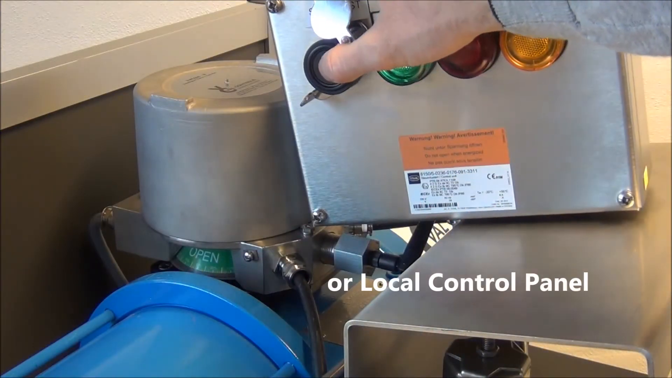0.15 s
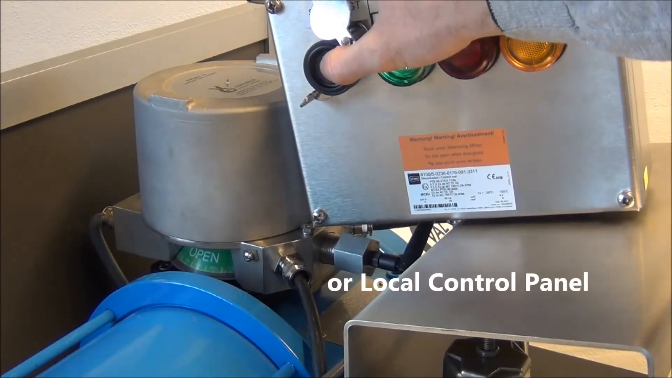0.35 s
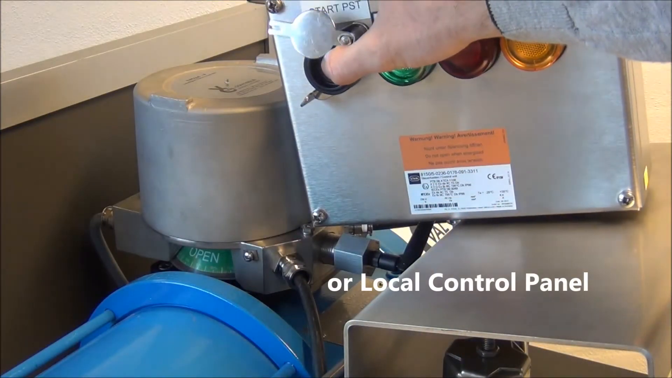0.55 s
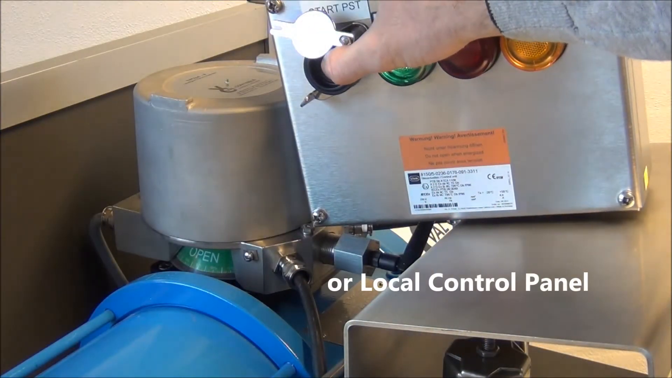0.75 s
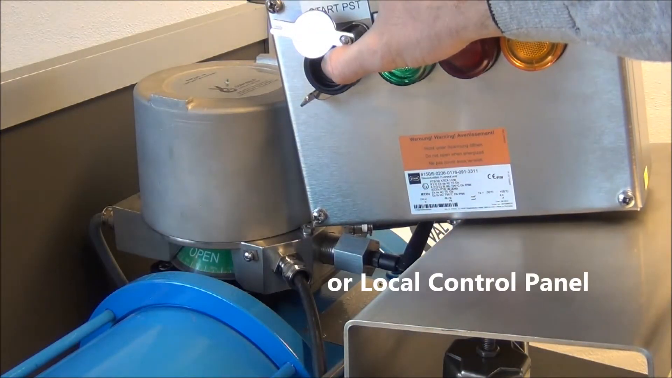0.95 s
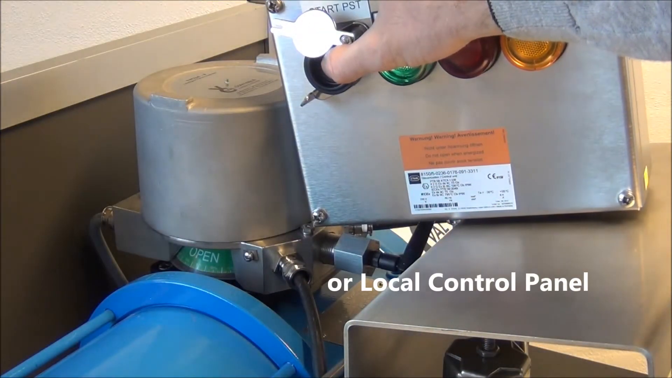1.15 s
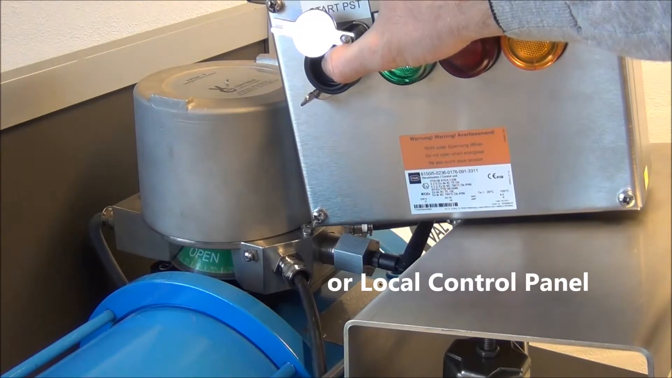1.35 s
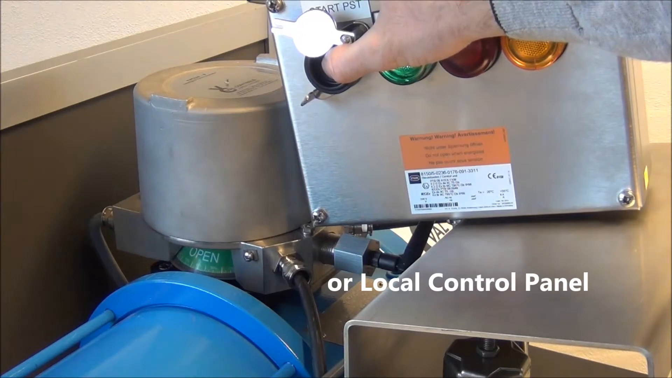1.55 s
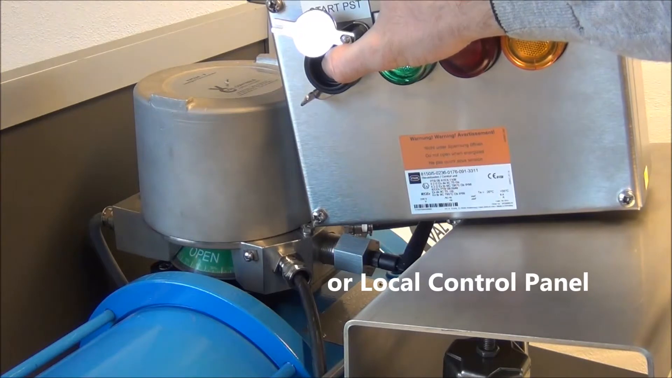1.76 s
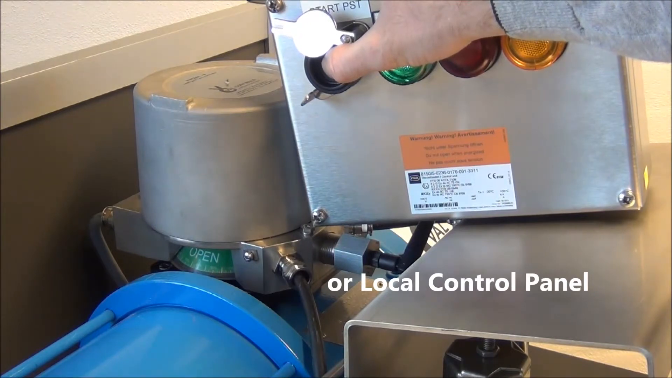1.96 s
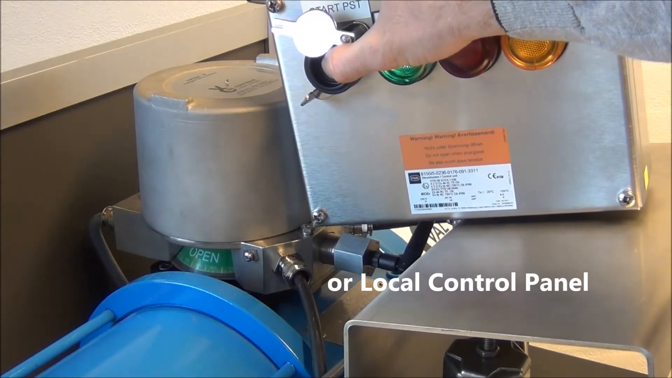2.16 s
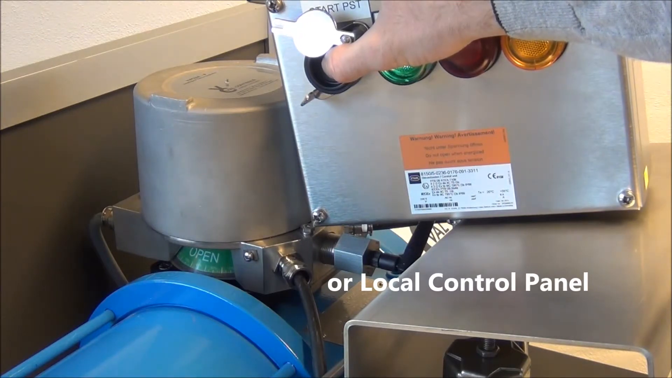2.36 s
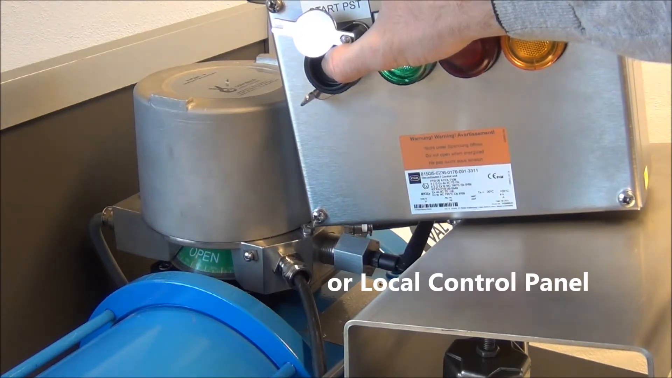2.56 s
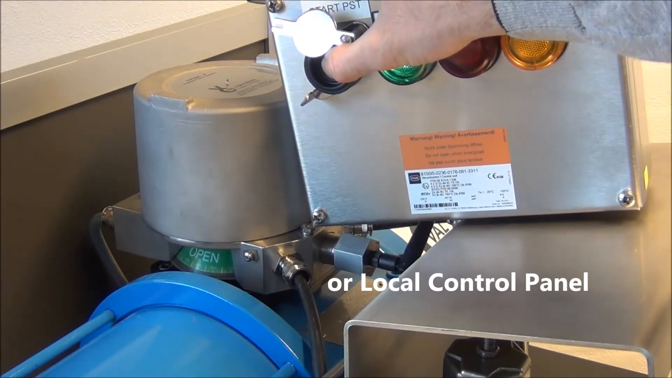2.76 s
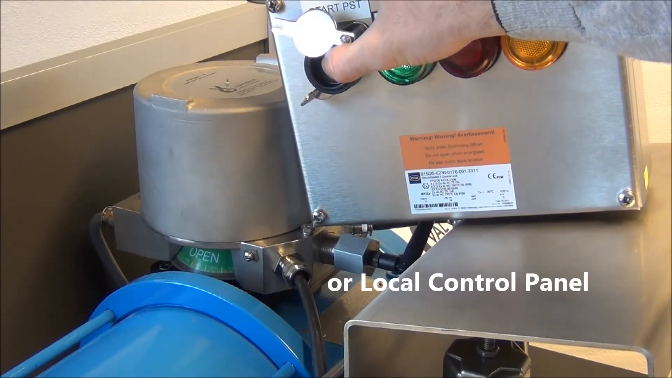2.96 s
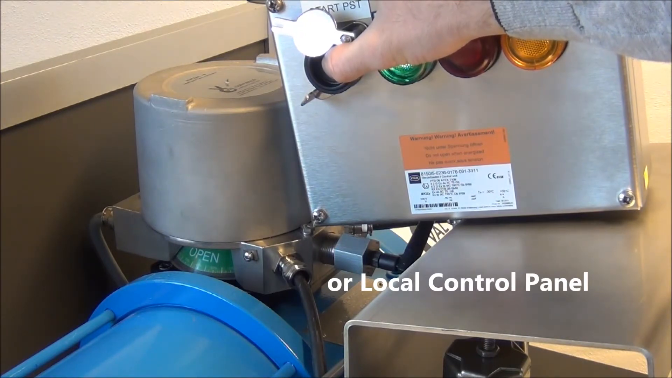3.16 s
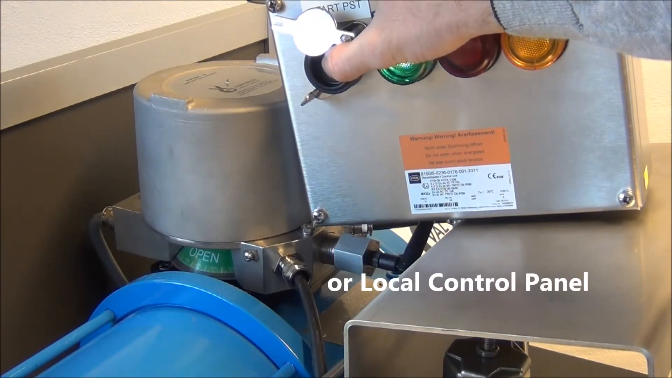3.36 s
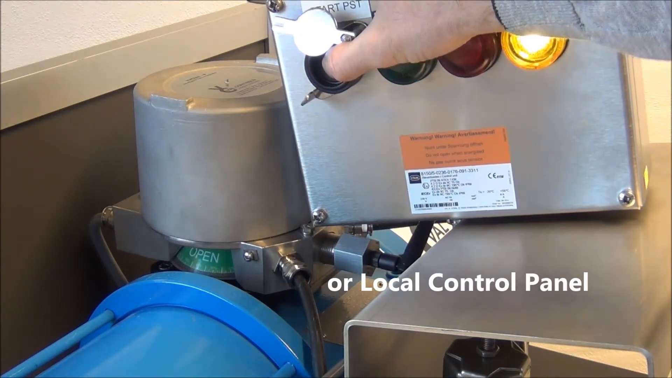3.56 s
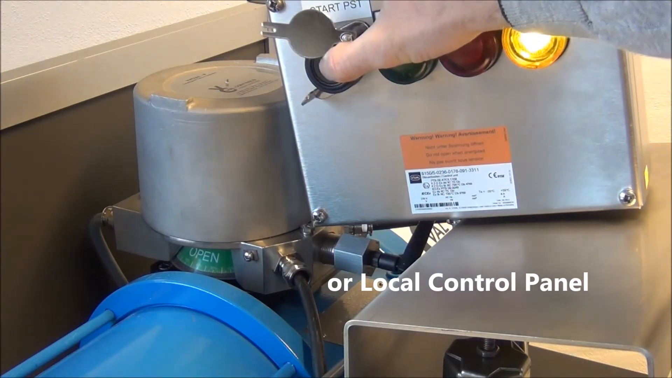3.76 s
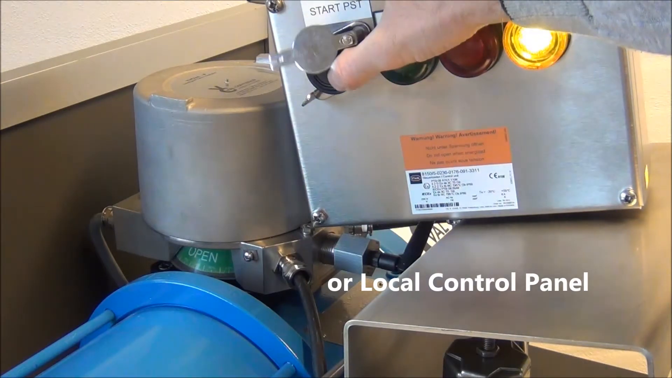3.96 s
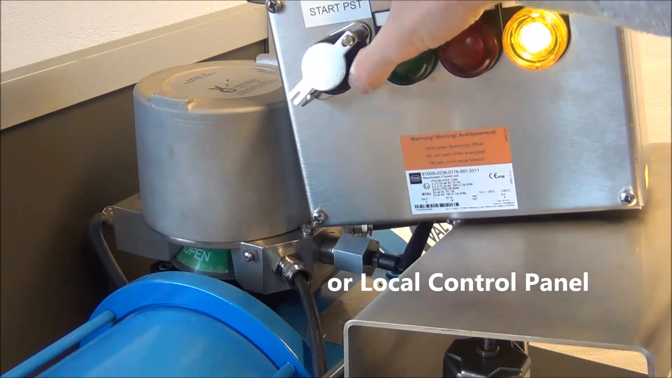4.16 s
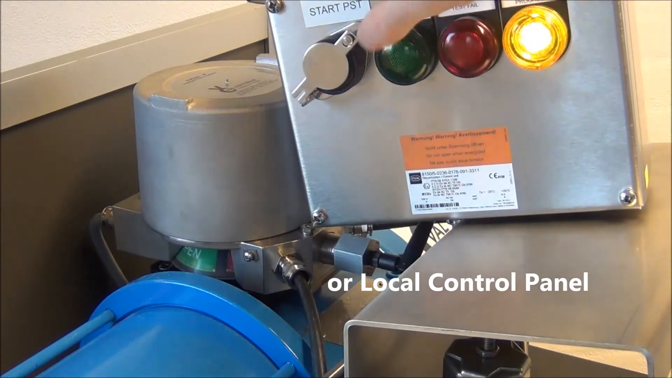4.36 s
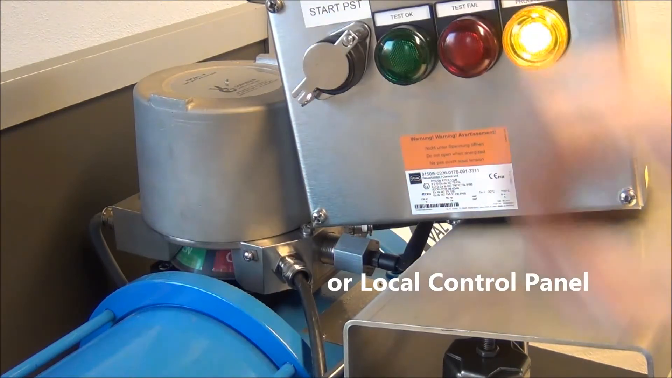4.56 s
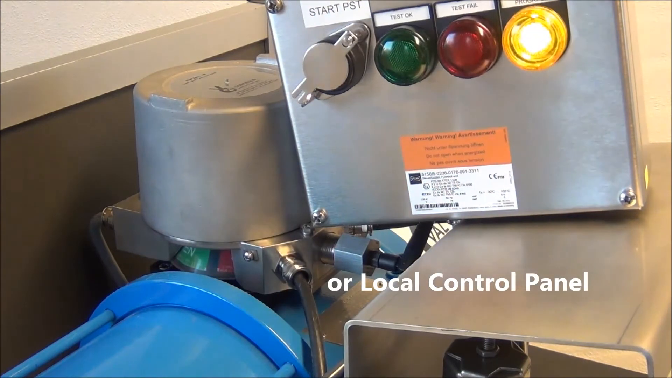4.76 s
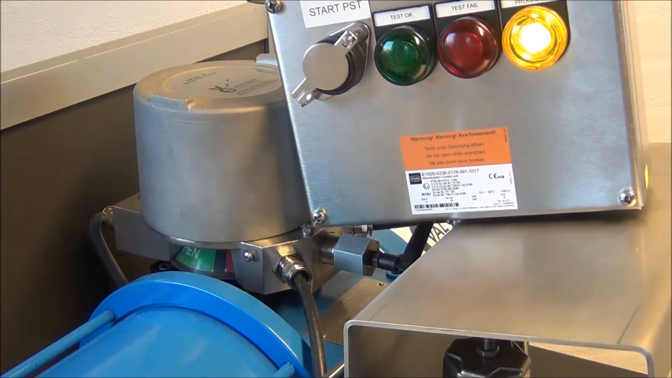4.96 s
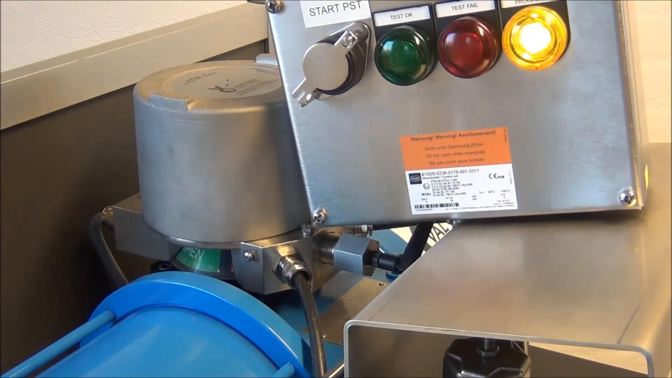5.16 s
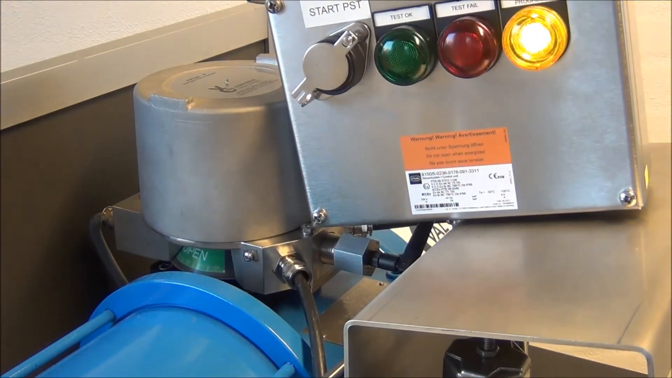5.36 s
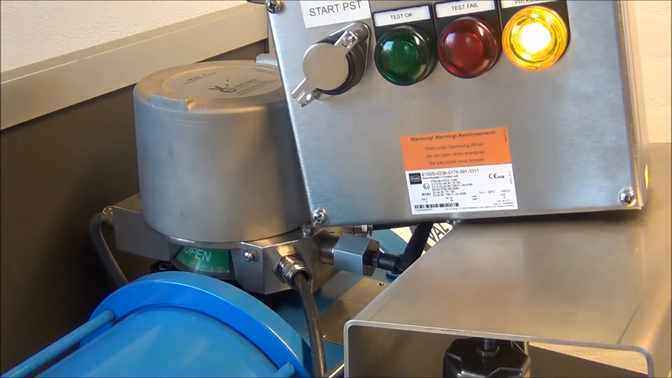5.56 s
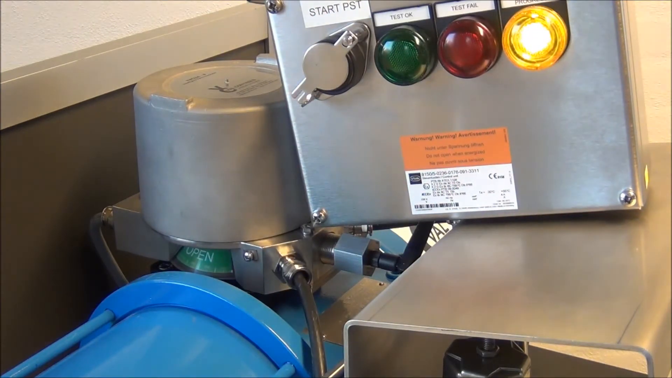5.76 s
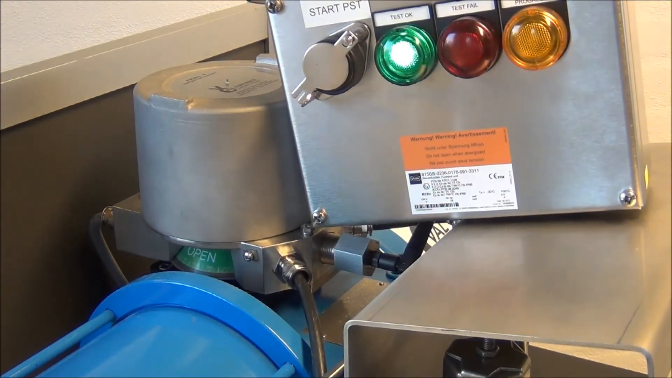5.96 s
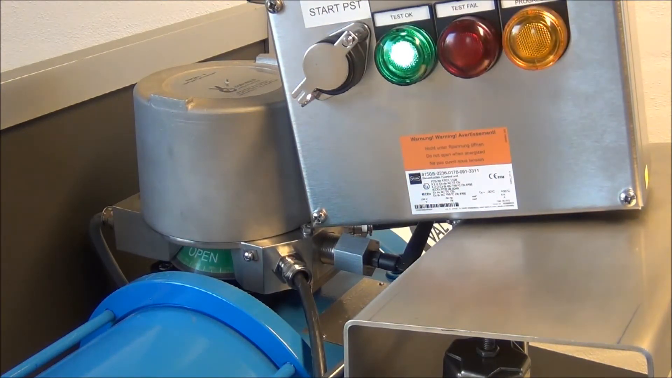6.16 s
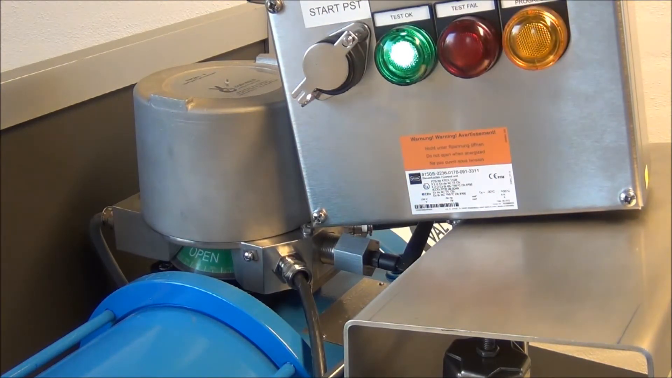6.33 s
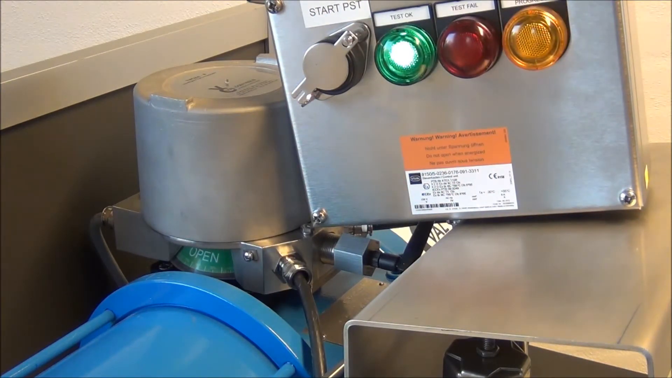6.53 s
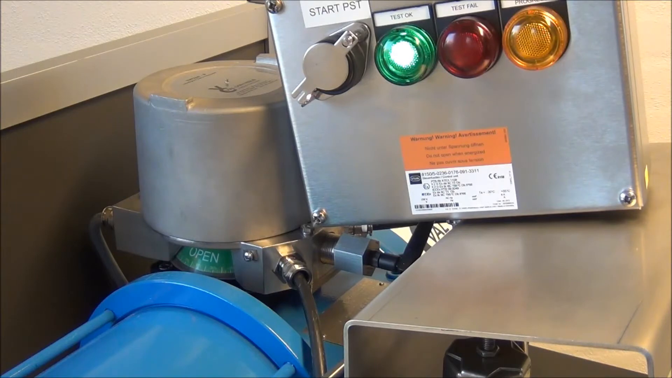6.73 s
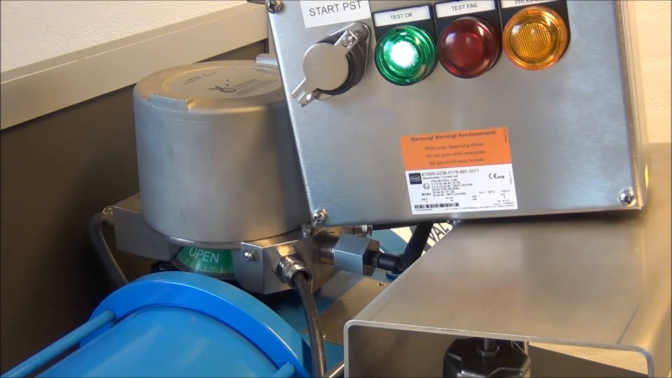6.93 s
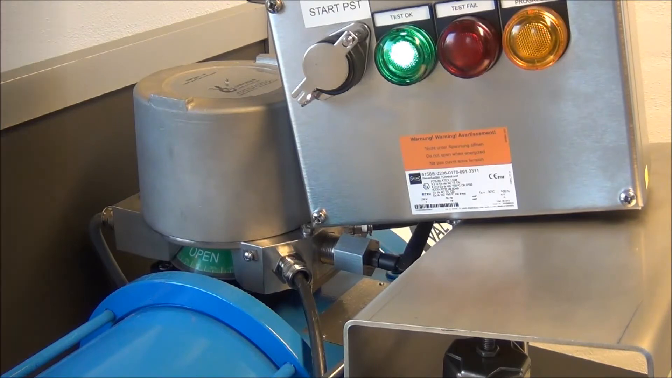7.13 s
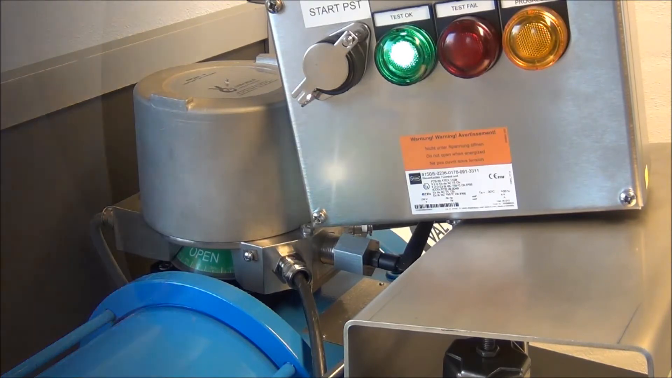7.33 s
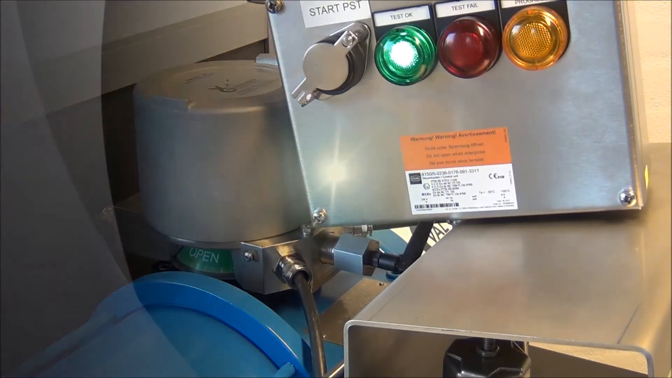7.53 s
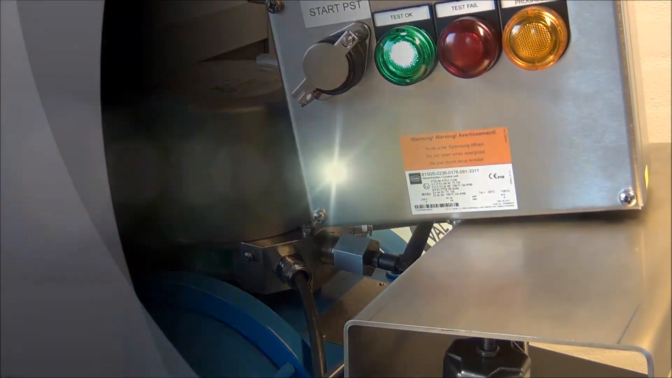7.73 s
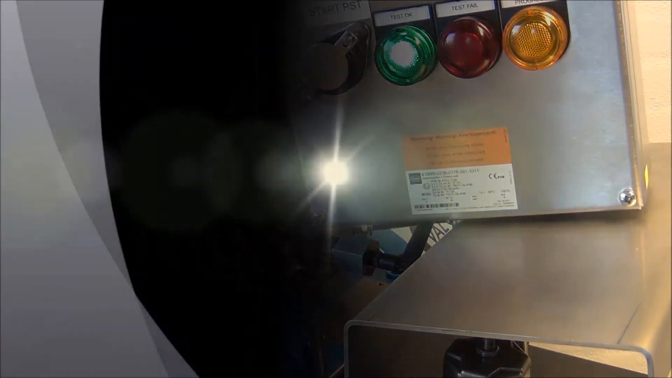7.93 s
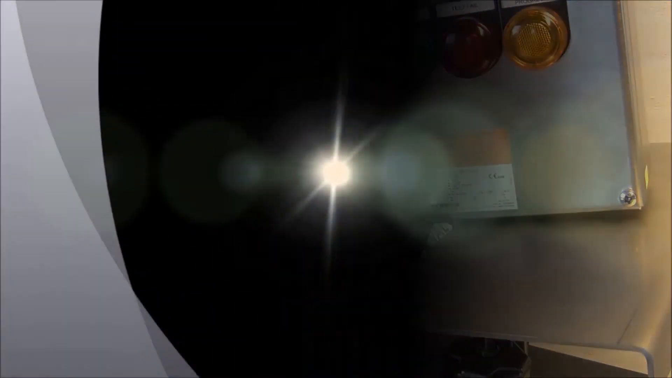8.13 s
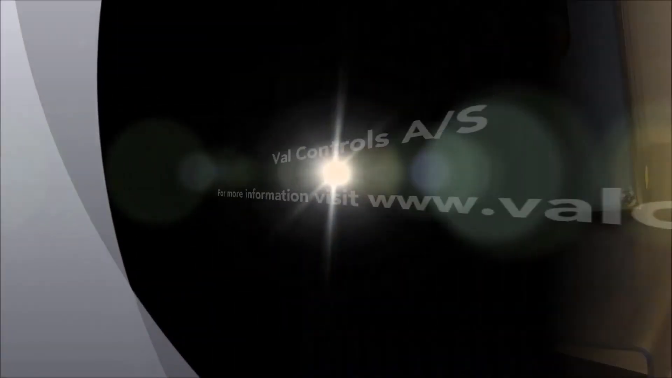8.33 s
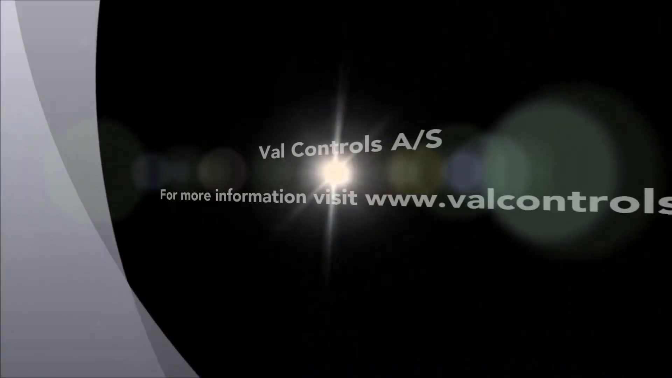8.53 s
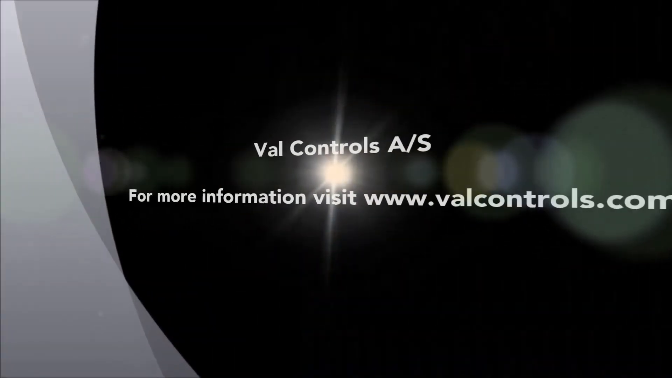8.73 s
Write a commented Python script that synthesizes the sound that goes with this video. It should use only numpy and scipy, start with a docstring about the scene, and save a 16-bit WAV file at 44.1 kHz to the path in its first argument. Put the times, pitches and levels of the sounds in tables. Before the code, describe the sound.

Faint ventilation noise runs throughout in a small room. From about 0.2 seconds, a push button and its metal cover tap and scrape close by, ending at 0.6 in a sharp clack that briefly rings a steel box. A tiny tick follows near 1.9. At 3.5 seconds a valve knocks and a pneumatic actuator releases a loud, bright jet of air, by far the loudest sound, weakening slightly until it shuts with a dull knock at 4.6. Air then flows back in a softer hiss with faint wavering whistles, growing brighter until about 6.4. The piston knocks lightly a few times between 6.15 and 6.4. At 6.2 a compressor starts farther off with a short low shudder and settles into a quiet, throbbing hum with a thin whine. The background dips after loud sounds and creeps back. Everything stops at about 8.6 seconds.

```python
"""At a steel control box beside a pneumatic actuator, over faint ventilation noise.
A push button and its metal cover clack and scrape, exciting the box's modes. A solenoid valve then dumps
the actuator's air in one loud turbulent jet. Air flows back more softly, with faint edge tones, until the
piston knocks home, and a compressor starts to hum at harmonics of its shaft rate.
An automatic gain control ducks at each loud sound and creeps back up."""
import sys
import numpy as np
from scipy import signal
from scipy.fft import rfft, irfft, next_fast_len
from scipy.io import wavfile
from scipy.ndimage import uniform_filter1d

SR = 44100
rng = np.random.default_rng(int(sys.argv[2]) if len(sys.argv) > 2 else 0)


def to_wav(sig):
    """Store sig (one row per channel, or 1-D mono) as 16-bit WAV at the path in sys.argv[1].

    Samples outside -1..1 are clipped; the rate is SR.
    """
    pcm = np.clip(np.atleast_2d(sig), -1, 1) * 32767
    pcm = np.round(pcm).astype(np.int16)
    wavfile.write(sys.argv[1], SR, pcm.T)  # frames by channels


N = 387638
TIME = np.arange(N) / SR


def amp(db):
    """Amplitude ratio of a level in decibels."""
    return 10 ** (np.asarray(db) / 20)


def unit(x):
    """Normalisation to rms 1."""
    return x / np.sqrt(np.mean(x ** 2) + 1e-20)


def along(points, hz):
    """Interpolation of (frequency, value) points on a logarithmic frequency axis."""
    point_hz, values = np.transpose(points)
    return np.interp(np.log(hz + 1), np.log(point_hz + 1), values)


def wobble(rate, size=N):
    """Random modulation: straight lines between Gaussian knots, rate of them a second."""
    knots = rng.standard_normal(int(size * rate / SR) + 2)
    return np.interp(np.arange(size) * rate / SR, np.arange(len(knots)), knots)


def gate(start, end, rise_s, release_t60, sag_db_per_s=0):
    """Exponential envelope: it rises from start, sags steadily and dies away after end."""
    held, released = np.maximum(TIME - start, 0), np.maximum(TIME - end, 0)
    return (1 - np.exp(-held / rise_s)) * amp(-sag_db_per_s * held - 60 * released / release_t60)


def filtered(x, gain):
    """Zero-phase filtering: the spectrum of x times gain(frequency)."""
    n = x.shape[-1]
    padded = next_fast_len(n + 4096, True)
    return irfft(rfft(x, padded) * gain(np.fft.rfftfreq(padded, 1 / SR)), padded)[..., :n]


def lowpass(hz, cutoff_hz):
    """Magnitude response of a second-order Butterworth low-pass."""
    return 1 / np.sqrt(1 + (hz / cutoff_hz) ** 4)


def noise(spectrum, peaks=(), cutoff_hz=SR, size=N):
    """Source-filter model: white noise shaped by a broad spectrum and resonance peaks, at rms 1."""
    def gain(hz):
        peaks_db = sum(db / (1 + (2 * (hz - centre) / width) ** 2) for centre, width, db in peaks)
        return amp(along(spectrum, hz) + peaks_db) * lowpass(hz, cutoff_hz)
    return unit(filtered(rng.standard_normal(size), gain))


def stereo_noise(spectrum, peaks, width):
    """Partial coherence: two close microphones share a mid signal and differ by a side signal."""
    mid, side = noise(spectrum, peaks, size=(2, N))
    side = filtered(side, lambda hz: amp(along(width, hz)))
    return np.array([mid + side, mid - side])


def pan(left_db):
    """A level difference between the channels sets a source off centre."""
    return amp([[left_db], [-left_db]])


def add(track, start, sound):
    """Superposition of a short sound on a track, from start in seconds."""
    part = track[round(start * SR):][:len(sound)]
    part += sound[:len(part)]


# reverberation time of the room: (frequency [Hz], t60 [s])
ROOM_T60 = [(100, .6), (500, 0.28), (3000, 0.24), (8000, 0.47), (15000, 0.55)]

def room(x):
    """Diffuse reverberation: convolution with decaying noise, shortest in the midrange."""
    hz, t, spectra = signal.stft(rng.standard_normal((2, SR)), SR, nperseg=256)
    tail = signal.istft(spectra * amp(-60 * t / along(ROOM_T60, hz)[:, None]), SR, nperseg=256)[1]
    return signal.fftconvolve(x, tail / np.linalg.norm(tail[0]), axes=1)[:, :N]


def panel_echoes(x, channels, count=14):
    """Early reflections: copies from nearby steel sheets ripple the spectrum by interference."""
    echoes = np.zeros((channels, SR // 40))  # delays up to 25 ms
    for channel in echoes:
        signs = rng.choice([-1, 1], count)
        channel[rng.integers(SR // 400, len(channel), count)] = signs / np.sqrt(count)
    return signal.oaconvolve(np.atleast_2d(x), echoes, axes=1)[:, :N]


# spectrum of the noise floor: (frequency [Hz], relative level [dB])
FLOOR_SPECTRUM = [(15, -43), (25, -11.5), (61, 0.5), (110, -11.5), (221, -11.5), (469, -15), (631, -12.5),
                  (722, -16), (1050, -15), (1380, -19.5), (2060, -21.5), (12500, -26), (15500, -26)]
# its stereo width: (frequency [Hz], side minus mid [dB])
FLOOR_WIDTH = [(60, -27.5), (240, -6.5), (950, -2.5), (3770, -3), (15000, -14)]

def ventilation(level_db=-48):
    """Stationary broadband noise: ventilation and microphone hiss form the noise floor."""
    return amp(level_db) * stereo_noise(FLOOR_SPECTRUM, (), FLOOR_WIDTH)


# harmonics of the low hum: (frequency [multiples of the shaft rate])
HUM_ORDERS = (1, 2, 3, 4, 6, 7, 9, 16)
# harmonics at which the housing whines: (frequency [multiples of the shaft rate])
WHINE_ORDERS = (35, 38, 39, 40, 41, 44, 58, 75)
# strength of each whine harmonic: (level [dB])
WHINE_LEVELS = (-59, -57.5, -57.5, -64, -63, -52, -60.5, -66)
# spectrum of the pump noise: (frequency [Hz], relative level [dB])
PUMP_SPECTRUM = [(40, -10), (100, -9.5), (400, -9.5), (1100, -22.5), (2200, -12.5), (3500, -17),
                 (5000, -25), (9000, -20), (15000, -32.5)]
# resonances of the housing: (frequency [Hz], bandwidth [Hz], gain [dB])
HOUSING_PEAKS = [(787, 70, -4.5), (1350, 490, 13.5), (1880, 220, 9), (2177, 27, 6.5), (2805, 220, 6.5),
                 (3630, 83, 15)]
# stereo width of the pump noise: (frequency [Hz], side minus mid [dB])
PUMP_WIDTH = [(60, -28.5), (380, -13), (2380, -7.5), (15000, -32)]
# spectrum of the starting shudder: (frequency [Hz], relative level [dB])
SHUDDER_SPECTRUM = [(30, -4), (100, 6.5), (300, -5), (700, -24.5), (2000, -48.5)]

def compressor(start=6.2, rise_s=.3, shaft_hz=48.72, drift=.0007, throb_depth=.23,
               buzz_db=-54, pump_db=-48, shudder_db=-40):
    """Periodic forcing: shaft harmonics, a buzz and throbbing pump noise swell with a brief shudder."""
    turns = shaft_hz * np.cumsum(1 + drift * wobble(4)) / SR
    hum = [(order, -57 - .5 * np.log2(order)) for order in HUM_ORDERS]  # falls 0.5 dB per octave
    whine = list(zip(WHINE_ORDERS, WHINE_LEVELS))
    tones = sum(np.sqrt(2) * amp(db) * np.sin(2 * np.pi * (order * turns + rng.random()))
                for order, db in hum + whine)
    strokes = np.diff(np.floor(turns), prepend=0)  # one pulse per turn
    stroke_sound = noise(PUMP_SPECTRUM, cutoff_hz=5600, size=1024)
    buzz = unit(signal.fftconvolve(strokes, stroke_sound)[:N])
    throb = 1 + throb_depth * np.sin(2 * np.pi * turns)
    pump = throb * stereo_noise(PUMP_SPECTRUM, HOUSING_PEAKS, PUMP_WIDTH)
    pump = filtered(pump, lambda hz: lowpass(hz, cutoff_hz=6400))
    swell = 1 - np.exp(-np.maximum(TIME - start, 0) / rise_s)
    running = swell * (tones + amp(buzz_db) * buzz + amp(pump_db) * pump)
    shudder = amp(shudder_db) * gate(start, start + .26, rise_s, release_t60=.4) * noise(SHUDDER_SPECTRUM)
    return (running + shudder) * pan(left_db=.4)


# whistles of the air line: (start [s], end [s], start pitch [Hz], end pitch [Hz], relative level [dB])
EDGE_TONES = [(4.85, 5.6, 1650, 1700, -47), (5.28, 5.65, 2110, 1970, -47), (5.65, 6, 1880, 1780, -50),
              (4.7, 5.45, 2260, 2335, -46), (4.7, 5.6, 2920, 2880, -43), (4.7, 5.25, 3330, 3220, -44),
              (5.05, 5.38, 4560, 4420, -45), (4.9, 5.2, 1000, 990, -48)]

def whistles(waver=.006, flicker_db=4, faint_count=14, low_hz=1900, high_hz=6000):
    """Edge tones flicker and glide as the pressure changes, among fainter ones that come and go."""
    out, faint = np.zeros(N), []
    for when, pitch, fall in rng.random((faint_count, 3)):
        start = 4.6 + .5 * when
        hz = low_hz * (high_hz / low_hz) ** pitch
        faint.append((start, start + .45, hz, hz * (1 - .03 * fall), -51))  # columns as in EDGE_TONES
    for start, end, start_hz, end_hz, db in EDGE_TONES + faint:
        n = round((end - start) * SR)
        hz = np.linspace(start_hz, end_hz, n) * (1 + waver * wobble(200, n))
        envelope = amp(db + flicker_db * wobble(50, n)) * np.hanning(n)
        add(out, start, envelope * np.sin(2 * np.pi * np.cumsum(hz) / SR))
    return out


# inflow to the cylinder as a fading surge, a long fill and a last top-up:
# (open [s], shut [s], level [dB], rise [s], sag [dB/s], added cutoff [Hz])
INFLOWS = [(4.662, 5.601, -14.5, .01, 29.5, 0), (5.22, 6.37, -23, 0.55, 0.5, 14501),
           (6.554, 6.593, -49, 0.022, 1, 7000)]
# spectrum of the supply hiss: (frequency [Hz], relative level [dB])
SUPPLY_SPECTRUM = [(200, -13.5), (600, -9.5), (1800, -6), (4500, -5.5), (7000, 0.5), (10000, -2.5),
                   (14000, 1), (15600, -5)]
# its resonances: (frequency [Hz], bandwidth [Hz], gain [dB])
SUPPLY_PEAKS = [(1780, 106, 3), (3000, 920, 4.5), (4490, 660, 6), (5520, 170, 4.5), (6320, 76, 5.1),
                (7820, 260, 5.5), (9141, 1000, 7), (10530, 799, 10), (12860, 210, 9.5)]
# its stereo width: (frequency [Hz], side minus mid [dB])
SUPPLY_WIDTH = [(400, -49), (4500, -19.5), (6000, -8.5), (14000, -4.5), (15500, -23)]

def refill(trickle_cutoff_hz=4300, release_t60=.51):
    """Flow noise: the returning air hisses louder and brighter as the supply port opens."""
    flow, cutoff_hz = 0, trickle_cutoff_hz
    for start, end, db, rise_s, sag_db_per_s, added_hz in INFLOWS:
        opening = gate(start, end, rise_s, release_t60, sag_db_per_s)
        flow += amp(db) * opening
        cutoff_hz += added_hz * opening
    turbulence = stereo_noise(SUPPLY_SPECTRUM, SUPPLY_PEAKS, SUPPLY_WIDTH)
    hz, t, spectra = signal.stft(turbulence, SR, nperseg=512)
    spectra *= lowpass(hz[:, None], np.interp(t, TIME, cutoff_hz))
    hiss = signal.istft(spectra, SR, nperseg=512)[1][:, :N]
    return flow * hiss * pan(left_db=.14)


# the cover rubs, catches and settles: (start [s], end [s], level [dB], release t60 [s])
SCRAPES = [(0.369, 0.547, -42.5, .05), (0.445, 0.452, -43, 0.09), (.525, 0.526, -29.5, .1),
           (0.55, 0.566, -24.5, 0.02), (0.595, 0.612, -23, .34)]
# spectrum of the friction: (frequency [Hz], relative level [dB])
FRICTION_SPECTRUM = [(60, -28.5), (250, -8), (700, -1), (3000, -12), (6000, -12.5), (15000, -22.5)]
# its resonances: (frequency [Hz], bandwidth [Hz], gain [dB])
FRICTION_PEAKS = [(238.8, 34, 22.5), (1423, 69, 19.5), (1810, 170, 9.5), (4610, 640, 11), (12600, 200, 18)]

def cover(grip_db=1.5, rise_share=.25):
    """Stick-slip friction: the button's cover scrapes over the steel, then rattles to rest."""
    force = sum(amp(db) * gate(start, end, rise_share * (end - start), t60)
                for start, end, db, t60 in SCRAPES)
    return force * amp(grip_db * wobble(134.15)) * noise(FRICTION_SPECTRUM, FRICTION_PEAKS)


# finger, button and cover strike the box:
# (time [s], thud level [dB], steel level [dB], cutoff [Hz], rattle t60 [s])
CONTACTS = [(.176, -36.5, -36, 1280, 0.041), (0.296, -30, -41.5, 800, 0.24), (.442, -32, -48, 1790, 0.17),
            (0.554, -32, -17.5, 2510, 0.03), (.559, -48.5, -25, 5630, 0.071),
            (0.589, -38, -12.5, 10940, 0.075), (.601, -23.5, 2.5, 10600, 0.037),
            (0.688, -59, -26, 4430, 0.032), (1.866, -62, -37.5, 4000, 0.022)]
# modes of the steel box: (frequency [Hz], relative level [dB], t60 [s])
BOX_MODES = [(254, -11.5, 0.13), (1440, -22, 0.27), (2859, -8.5, 0.25), (6500, -19.5, 0.2),
             (6550, -19.5, 0.3), (8554, -29.5, 0.25), (10200, -25, 0.13), (11700, -19, 0.18),
             (12000, -9, 0.18), (14760, -17.5, 0.15), (15630, -34.5, 0.037)]
# spectrum of the contact rattle: (frequency [Hz], relative level [dB])
RATTLE_SPECTRUM = [(40, -25), (150, -26), (400, 6), (1000, -1), (3000, -6), (6000, 7.5), (9000, -3.5),
                   (13000, -5), (15600, -2.5)]
# its resonances: (frequency [Hz], bandwidth [Hz], gain [dB])
RATTLE_PEAKS = [(1497, 270, 13.5), (1830, 270, 10.5), (2610, 170, 8.5), (3570, 1600, 7.5), (8603, 294, 7),
                (9430, 1500, 15), (12150, 800, 23.5), (15000, 326, 19)]

def button(ring_db=-17, looseness=.97, steel_rise_s=.0011, wall_hz=243, wall_t60=.2, wall_rise_s=.0065):
    """Impact excitation of modes: each contact rattles, rings the steel box and thumps its thin wall."""
    out, t = np.zeros(N), np.arange(SR // 3) / SR
    for start, thud_db, steel_db, cutoff_hz, t60 in CONTACTS:
        rattle = noise(RATTLE_SPECTRUM, RATTLE_PEAKS, cutoff_hz, size=len(t)) * amp(-60 * t / t60)
        ring = 0
        for hz, db, mode_t60 in BOX_MODES:
            envelope = amp(db + rng.normal() - 60 * t / mode_t60) * lowpass(hz, cutoff_hz)
            # loose parts keep disturbing the phase of every mode
            stray_cycles = looseness * np.cumsum(rng.standard_normal(len(t))) / np.sqrt(SR / 20)
            ring += envelope * np.sin(2 * np.pi * (hz * t + stray_cycles))
        steel = amp(steel_db) * (rattle + amp(ring_db) * ring) * (1 - np.exp(-t / steel_rise_s))
        thud_envelope = amp(thud_db - 60 * t / wall_t60) * (1 - np.exp(-t / wall_rise_s))
        add(out, start, steel + thud_envelope * np.sin(2 * np.pi * wall_hz * t))
    return out


# impacts of valve spool and piston: (time [s], level [dB], cutoff [Hz], t60 [s])
KNOCKS = [(3.504, -13.5, 420, .1), (3.523, -3.5, 810, .035), (4.629, -10, 620, 0.26),
          (4.76, -24.5, 450, 0.47), (4.846, -26.5, 485, 0.57), (6.151, -24, 3020, 0.22),
          (6.219, -32.5, 1400, 0.17), (6.25, -32.5, 600, 0.18), (6.37, -33.5, 905, 0.14)]
# spectrum of the actuator body: (frequency [Hz], relative level [dB])
CASTING_SPECTRUM = [(40, -20), (170, -10.5), (400, -2), (1000, -1.5), (3000, 6.5), (9000, -7.5)]
# its resonances: (frequency [Hz], bandwidth [Hz], gain [dB])
CASTING_PEAKS = [(244, 130, 8), (1110, 200, 4), (1776, 200, 6), (2600, 250, 3.5), (4120, 300, 5.5)]

def knocks():
    """Damped vibration: spool and piston strike their stops inside the heavy casting."""
    out, t = np.zeros(N), np.arange(SR // 2) / SR
    for start, db, cutoff_hz, t60 in KNOCKS:
        body = noise(CASTING_SPECTRUM, CASTING_PEAKS, cutoff_hz, size=len(t))
        add(out, start, body * amp(db - 60 * t / t60))
    return out


# the exhaust port opens for a puff, then the full blast: (open [s], shut [s], level [dB], rise [s])
PORT_OPENINGS = [(3.504, 3.515, 2.5, 0.0042), (3.523, 4.628, 15, .009)]
# spectrum of the jet: (frequency [Hz], relative level [dB])
JET_SPECTRUM = [(60, -35), (150, -32.5), (350, -19), (800, -19.5), (2000, -13), (4000, -11.5),
                (7000, -11.5), (11000, -5.5), (14500, 0.5), (15600, -15)]
# silencer and cavity resonances: (frequency [Hz], bandwidth [Hz], gain [dB])
SILENCER_PEAKS = [(423, 50, 3.7), (715, 50, 2.7), (1152, 200, 9.1), (1504, 50, 3.2), (1626, 50, 4.8),
                  (1958, 174, 3.6), (3052, 265, 5.0), (3753, 138, 5.9), (4220, 272, 4.9), (5011, 287, 7.5),
                  (5381, 122, 4.9), (5728, 126, 5.7), (6013, 91, 4.2), (6699, 846, 12.4), (7823, 50, 4.1),
                  (8376, 833, 11.0), (9551, 900, 5.8), (10309, 383, 8.8), (11378, 623, 5.6),
                  (12030, 291, 5.4)]
# stereo width of jet and spill: (frequency [Hz], side minus mid [dB])
JET_WIDTH = [(100, -30), (1200, -64), (4000, -44), (7500, -17), (13000, -12.5), (15500, -23.5)]
# spectrum of the spill at the valve seat: (frequency [Hz], relative level [dB])
SPILL_SPECTRUM = [(150, -13), (450, -3), (900, -8.5), (3000, -4), (4300, -6.5), (4850, 7), (5400, -6),
                  (6600, -4.5), (9700, 4.5), (10800, -2.5), (12000, -9.5), (15500, -20)]

def exhaust(flutter_db=.36, spill_db=-3, spill_s=.092):
    """Turbulent jet noise weakens as the cylinder loses pressure; a last spill passes the closing spool."""
    flow = sum(amp(db) * gate(start, end, rise_s, release_t60=.025, sag_db_per_s=5)
               for start, end, db, rise_s in PORT_OPENINGS)
    jet = flow * amp(flutter_db * wobble(35)) * stereo_noise(JET_SPECTRUM, SILENCER_PEAKS, JET_WIDTH)
    shut = PORT_OPENINGS[-1][1]
    leak = gate(shut, shut + spill_s, rise_s=.004, release_t60=.079, sag_db_per_s=66.5)
    spill = amp(spill_db) * leak * stereo_noise(SPILL_SPECTRUM, (), JET_WIDTH)
    return (jet + spill) * pan(left_db=-.45)


def scene(whistle_gain_db=2, reverb_db=-20):
    """Superposition: box and actuator close by with their reflections, compressor and ventilation beyond."""
    hiss = exhaust() + refill()
    hiss = hiss + amp(-19) * panel_echoes(hiss, channels=1)
    hits = button() + cover() + knocks()
    hits = hits + amp(-15) * panel_echoes(hits, channels=2)
    near = hits + hiss + amp(whistle_gain_db) * whistles()
    return near + amp(reverb_db) * room(near) + compressor() + ventilation()


# closing fade: (time [s], gain [ratio])
FADE_OUT = [(8.615, 1), (8.635, 0)]

def record(dry, limit_db=-11, release_s=2.19, top_hz=15800):
    """Automatic gain control: an instant cut above the limit, a slow recovery; then fade and band limit."""
    power = np.abs(uniform_filter1d(np.mean(dry ** 2, axis=0), size=160))
    excess_db = np.maximum(10 * np.log10(power + 1e-12) - limit_db, 0)
    recovery = np.exp(TIME / release_s)
    cut_db = np.maximum.accumulate(excess_db * recovery) / recovery  # peak hold with exponential decay
    fade = np.interp(TIME, *np.transpose(FADE_OUT))
    return filtered(dry * amp(-cut_db) * fade, lambda hz: hz < top_hz)


dry = scene()
out = record(dry)
to_wav(out)
```